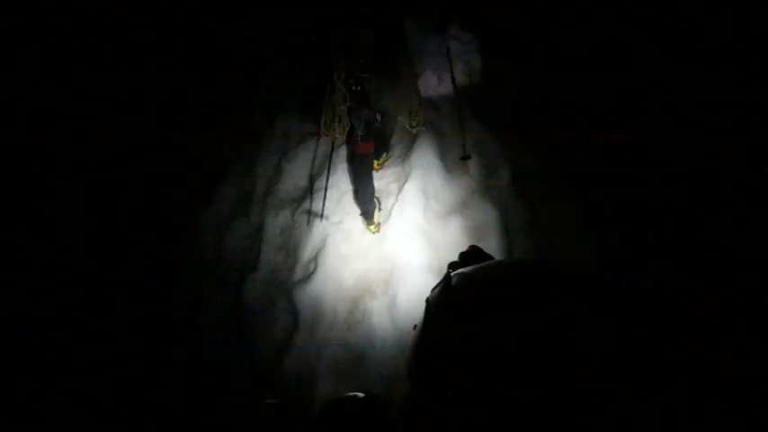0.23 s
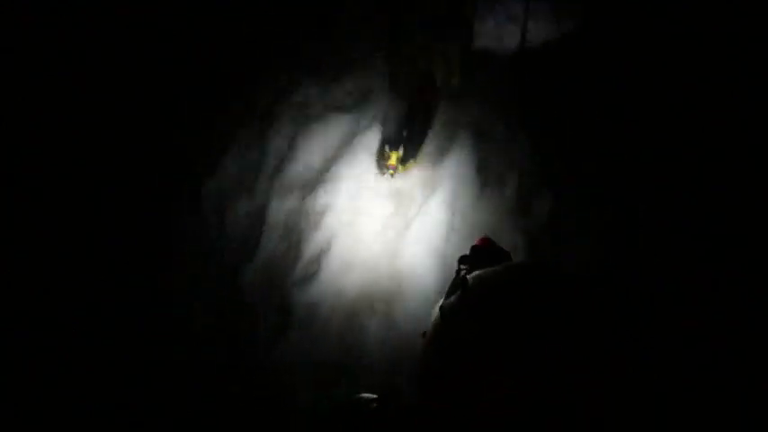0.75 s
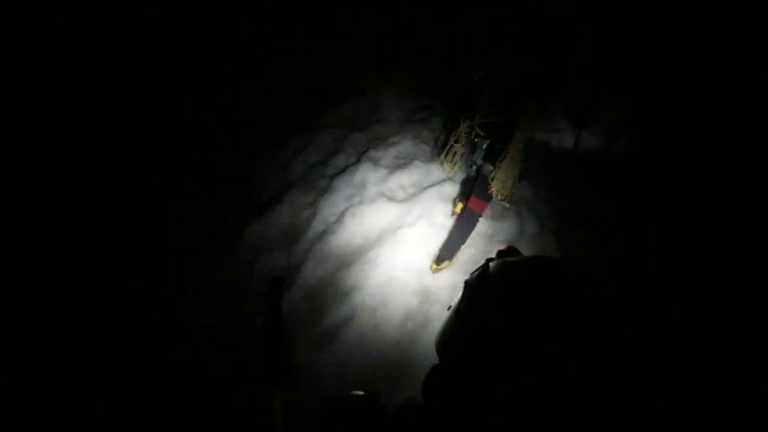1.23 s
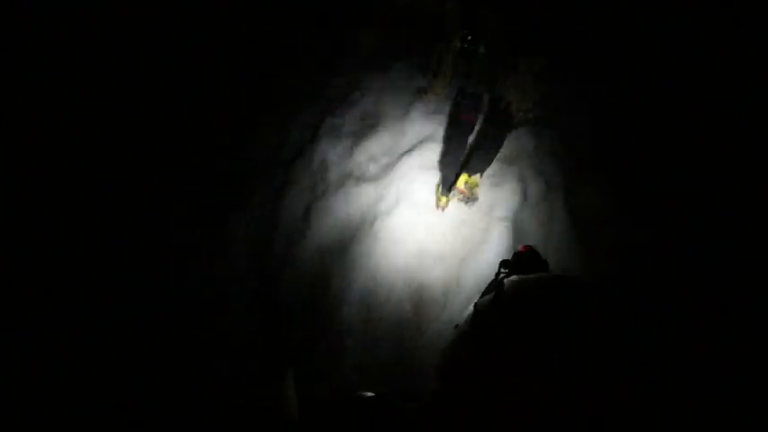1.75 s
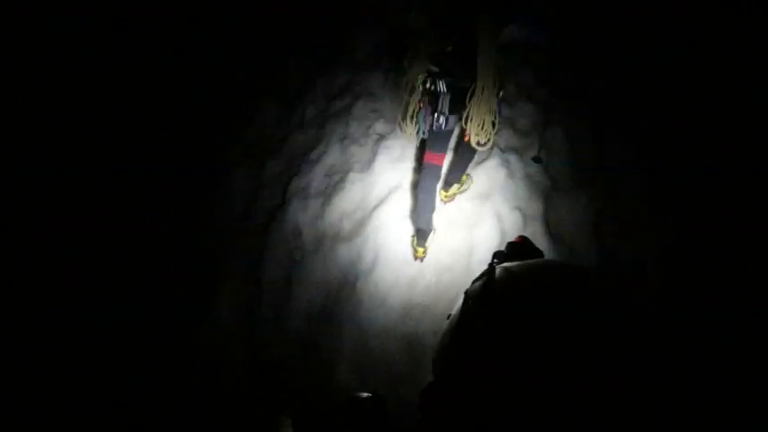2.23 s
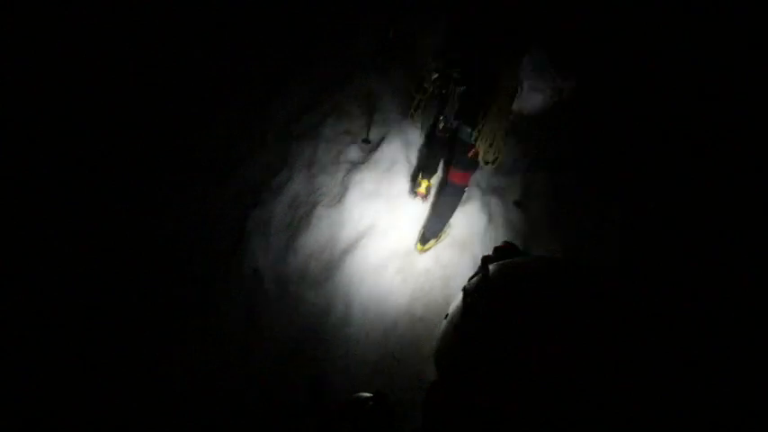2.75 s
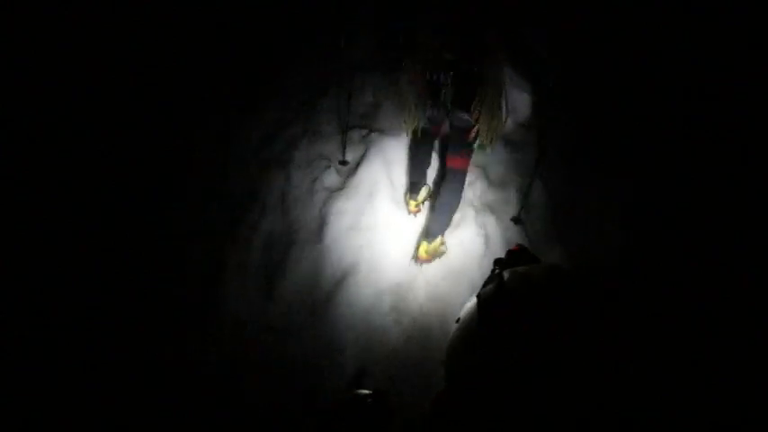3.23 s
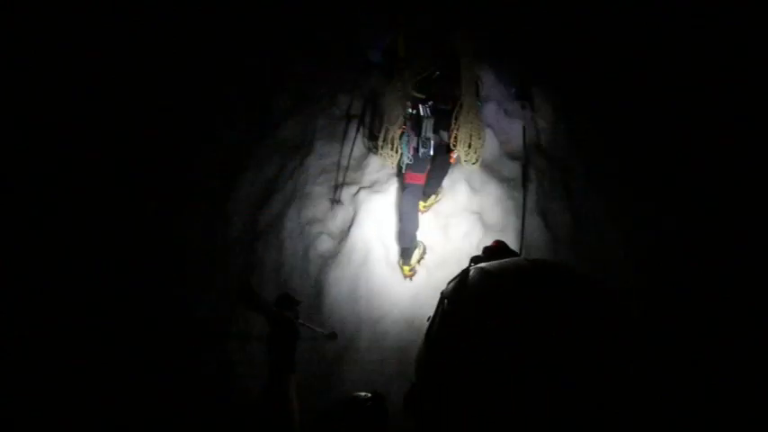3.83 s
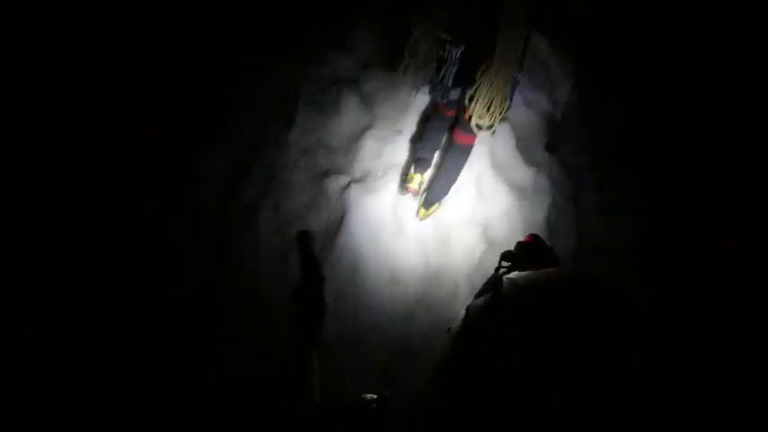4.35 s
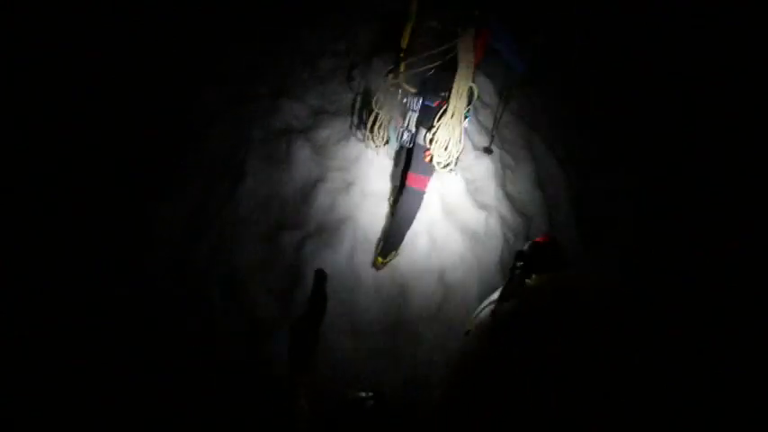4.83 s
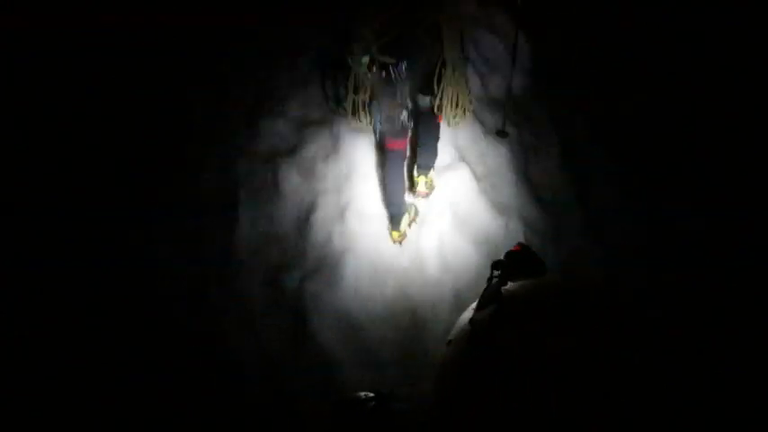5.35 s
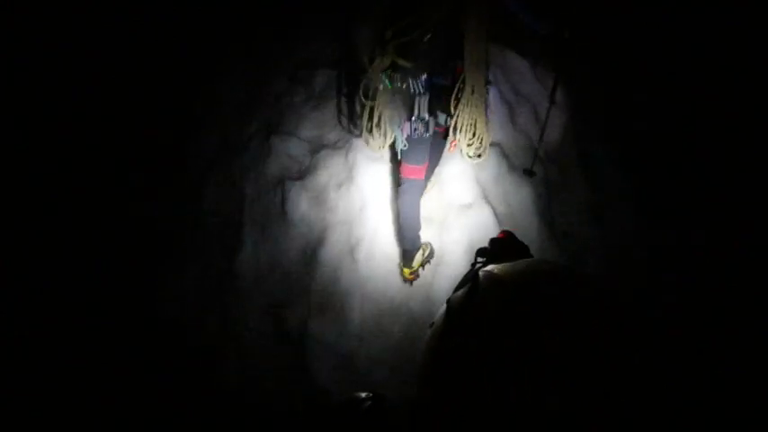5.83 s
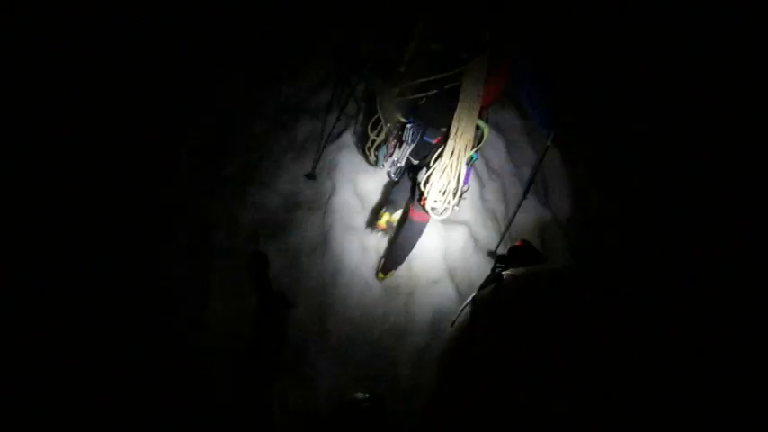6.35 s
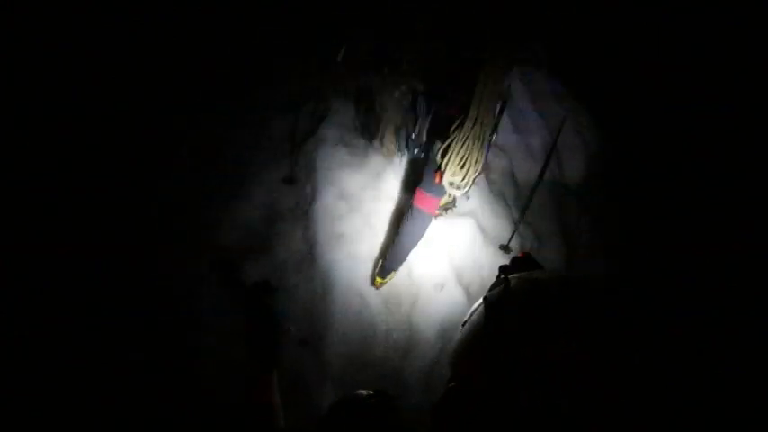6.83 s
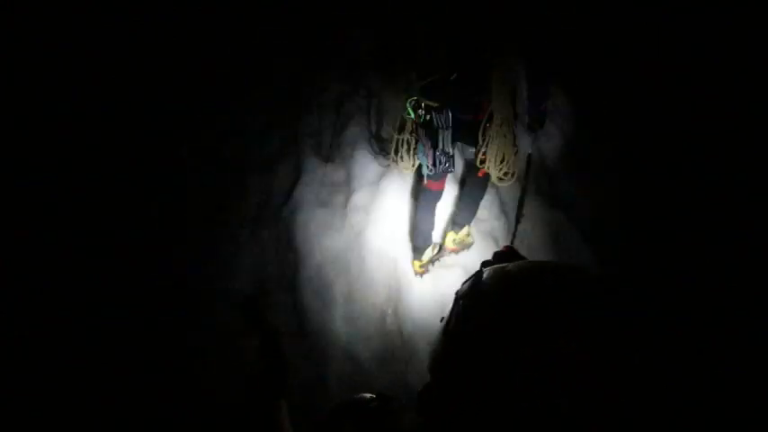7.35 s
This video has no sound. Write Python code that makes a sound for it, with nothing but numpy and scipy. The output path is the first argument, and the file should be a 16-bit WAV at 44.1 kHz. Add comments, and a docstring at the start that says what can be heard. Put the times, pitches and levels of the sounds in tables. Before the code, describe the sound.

Spiked boots tread firm, crusty snow a few metres away on an open slope at night. Each uneven step brings a grainy crunch, collapsing crust and dry snaps. A burst of heavy low thumps hits the microphone early on, a brief icy scrape comes midway, and steel gear clinks now and then. A faint steady hiss lies beneath, in close stereo from a microphone worn by a walker.

```python
"""A snowfield at night: spiked boots tread firm snow a few metres from a two-port microphone worn by a walker.
Snow crystals break in dense grains, crusts collapse in short swells and single cracks snap, all as random
clicks and noise in resonant bands; spikes dragged over ice squeal and steel gear clinks in decaying modes.
The walker's clothing or the moving air buffets the ports with low thumps, over a faint steady hiss.
All levels in dB apply ahead of the microphone's colouring."""
import sys
import numpy as np
from scipy import signal
from scipy.fft import rfft, irfft, next_fast_len
from scipy.io import wavfile
from scipy.ndimage import uniform_filter1d

SR = 44100
rng = np.random.default_rng(int(sys.argv[2]) if len(sys.argv) > 2 else 0)


def inscribe(sig):
    """Save sig as 16-bit PCM at rate SR to the path in sys.argv[1].

    A 1-D sig is mono; a 2-D sig holds one channel per row.
    Samples are clipped to [-1, 1] before scaling.
    """
    pcm = np.round(np.clip(np.atleast_2d(sig).T, -1, 1) * 32767)
    wavfile.write(sys.argv[1], SR, pcm.astype(np.int16))


N = 334719  # samples

# footfalls and light shuffles: (time of full load [s], time under load [s],
# body 300-1000 Hz [dB], crunch 1-3 kHz [dB], crisp 3-10 kHz [dB])
FOOTFALLS = [(-.1, 0.075, -50, -85, -79), (0.239, 0.534, -61, -61, -68.5), (1.231, 0.424, -58, -55.5, -76),
             (1.75, 0.1126, -65, -62.5, -87), (2.141, 0.382, -59.5, -61.5, -62.5),
             (3.012, 0.308, -55.5, -55, -67.5), (3.32, 0.099, -56, -66, -76), (3.6, 0.114, -73, -72.5, -62),
             (3.8, 0.642, -62, -64.5, -67), (4.718, 0.664, -64, -60, -68),
             (5.663, 0.067, -59.5, -54.5, -62), (5.82, 0.2344, -54.5, -54.5, -60),
             (6.151, 0.14, -69.5, -63, -78.5), (6.46, 0.057, -66, -69, -91), (6.7, 0.36, -59, -54.5, -63),
             (7.141, 0.064, -62.5, -61, -85.5)]


def undb(db):
    """Decibels to an amplitude ratio."""
    return 10 ** (np.asarray(db) / 20)


def unit(x):
    """Normalisation to rms 1."""
    return x / np.sqrt(np.mean(x ** 2))


def band(x, lo_hz, hi_hz, order=2):
    """Resonance as a causal Butterworth band-pass."""
    edges = np.clip([lo_hz, hi_hz], 10, 20000)
    return signal.sosfilt(signal.butter(order, edges, "bandpass", fs=SR, output="sos"), x)


def highpass(x, hz, order):
    """Causal Butterworth bass cut."""
    return signal.sosfilt(signal.butter(order, hz, "highpass", fs=SR, output="sos"), x)


def colour(x, points):
    """Spectral shaping through (frequency [Hz], gain [dB]) points on a log-frequency axis."""
    size = next_fast_len(N)
    hz, db = np.transpose(points)
    f = np.maximum(np.arange(size // 2 + 1) * SR / size, 1)
    gain = undb(np.interp(np.log(f), np.log(hz), db))
    return irfft(rfft(x, size) * gain, size)[..., :N]


def pair(x, lag_us):
    """Arrival-time difference: the same sound at both ports, left later by lag_us (half on each side)."""
    size = next_fast_len(len(x))
    f = np.arange(size // 2 + 1) * SR / size
    turn = np.exp(-1j * np.pi * f * lag_us * 1e-6)
    return irfft(rfft(x, size) * np.array([turn, 1 / turn]), size)[:, :len(x)]


def add(out, x, s):
    """Superposition: mix x in from time s; what falls outside is dropped."""
    i = int(s * SR)
    x = x[:, max(-i, 0):N - i]
    out[:, max(i, 0):max(i, 0) + x.shape[1]] += x


def walk(rate):
    """Random modulation: new levels at the given rate, joined by slopes; spread near 1."""
    k = int(SR / rate)
    held = np.repeat(rng.standard_normal(N // k + 1), k)
    return 1.06 * uniform_filter1d(held, k)[:N]


def grains(per_s, spread_db):
    """Random impulse train: clicks of either sign, a few larger than the rest, none huge."""
    chance, sign, size = rng.random((3, N))
    return (chance < per_s / SR) * np.sign(sign - .5) * undb(-spread_db * np.log(1.02 - size))


def crumbs(per_s, spread_db, tail_s):
    """Relaxation: lumps break one by one, the level jumping and then decaying; rms 1."""
    decay = np.exp(-1 / (tail_s * SR))
    return unit(signal.lfilter([1], [1, -decay], np.abs(grains(per_s, spread_db))))


def snow(per_s, spread_db, shared):
    """Brittle fracture: crystals ring by size, some clicks in every band and others in one band alone."""
    # three bands each for body, crunch and crisp: (centre [Hz], width [Hz], level [dB])
    size_bands = [
        [(354, 352.6, 1.5), (521.4, 215, 1), (750, 335, -0.5)],
        [(1383, 640, -5), (1581, 790, -1.5), (2782, 677, -9)],
        [(4140, 1730, -7), (5430, 7160, 1), (8440, 11600, -2.5)],
    ]
    every = shared * grains(per_s, spread_db)
    layers = []
    for group in size_bands:
        layer = 0
        for hz, width, db in group:
            clicks = every + grains(per_s, spread_db)
            layer = layer + undb(db) / np.sqrt(width) * band(clicks, hz - width / 2, hz + width / 2, order=1)
        layers.append(unit(layer))
    return np.array(layers)


def tread():
    """Load-driven fracture: snow patches creak with a fine hiss and lumps breaking in all bands or one."""
    # snow settling between footfalls: (body [dB], crunch [dB], crisp [dB])
    rest_db = [-71, -67, -73.5]
    # left-port lag of each patch of steady crunch: [us]
    patch_lags = [-150, -55, 3.5, 97]
    sink_s, lift_s = 0.047, 0.1022  # the load comes and goes
    shift_db, shift_per_s = 2.5, 9.  # it wavers as the weight shifts
    t, out = np.arange(N) / SR, 0
    load = [np.interp(t, [s - sink_s, s, s + hold, s + hold + lift_s], [0, 1, 1, 0]) ** 2
            for s, hold, *_ in FOOTFALLS]
    gain = undb(rest_db)[:, None] + undb([row[2:] for row in FOOTFALLS]).T @ load
    for lag in patch_lags:
        common = crumbs(30., 2.2, 0.00192)
        own = np.array([crumbs(40.0, 2.76, 0.00393) for _ in range(3)])  # body, crunch, crisp
        lumps = 0.289 + 0.4224 * common + 0.6656 * own
        weight = undb(shift_db * walk(shift_per_s))
        creak = gain * weight * snow(450., 1.96, 0.286) * lumps
        out = out + pair(creak.sum(0), lag)
    return out


def crush():
    """Cavity resonance: a collapse swells and dies as grains from both patch ends, each ringing a hollow."""
    # crust collapses: (time of peak [s], crunch [dB], length [ms], body re crunch [dB],
    # crisp re crunch [dB], left lag [us])
    collapses = [(0.018, -65, 33.5, 13.5, -12.5, 2), (.15, -50.5, 13.1, 5.5, -3.5, 26.5),
                 (0.228, -47.5, 14.7, 0, -3.5, 18), (.268, -41, 19.6, 1, -6.5, 18),
                 (0.3, -49.5, 25, -9.5, -2, 0), (0.439, -36.5, 25.9, -0.5, -8.5, 91),
                 (.487, -48.5, 32.5, 9.5, -9, 54), (0.661, -44.5, 10, -15, -28.5, 37),
                 (1.242, -44, 19.1, 0, 3, -77), (1.351, -41, 33.5, 0.5, -0.5, 26),
                 (1.662, -37.5, 14.7, -2.5, -11, 55.5), (1.833, -37.5, 18.5, -19, -18, -160),
                 (2.152, -46, 15, 8, 6.5, -56), (2.229, -51.5, 23, 6, 0, 0.5),
                 (2.335, -41.5, 22.1, 11.5, -3.5, 32), (2.429, -49, 79.4, 6, -3, -30),
                 (2.477, -41, 13.8, -3, -19.5, -66), (2.67, -50.5, 42.2, -1, -10.5, 68.5),
                 (3.031, -43.5, 20.3, -0.5, 6.5, -53.5), (3.115, -42.5, 29.4, 1.5, 1, 74),
                 (3.199, -40, 5.54, -20, -26, 40.5), (3.821, -43, 24, 4, 3, -52.5),
                 (3.855, -53, 17.7, 6.5, 12.5, -65), (3.938, -41, 24.5, 0, -1, 71),
                 (4.154, -40, 23.9, 0, -5, -29), (4.277, -62.5, 24.3, 22.5, -17.5, -11.5),
                 (4.445, -40.5, 8.4, -15.5, -9, -36), (4.48, -40, 25.1, -28, 0.5, 29.5),
                 (4.715, -48.5, 14.3, -23, -3, -26), (4.742, -41, 24.7, 0.5, 0, -31.5),
                 (4.807, -47, 25, 6, -22, 31), (4.902, -42, 36.2, 7, -8.5, 40.5),
                 (4.955, -57.5, 14.4, 19, -20, 40), (4.992, -51.5, 20.3, 11.5, -25, 41.5),
                 (5.092, -42.5, 13.5, -4, -22, 60), (5.122, -36, 37.1, -9.5, -15.5, 79),
                 (5.338, -48, 8.3, 3, -28.5, -8.5), (5.66, -50.5, 3.24, 9.5, -10, -23),
                 (5.685, -43.5, 23.5, 2, -5, -20), (5.729, -38.5, 14.9, -2.5, -9.5, -20),
                 (5.791, -47.5, 18.8, 14.5, 3.5, 49.5), (5.853, -52, 12.6, 9, -24.5, -3),
                 (5.935, -43.5, 17.6, -3.5, -14, 28), (6.013, -44.5, 21, -20.5, 4, 1.5),
                 (6.039, -56.5, 17.1, 16, 11.5, 0), (6.135, -47, 18.3, -5, 8, 44.5),
                 (6.651, -40, 30, -25.5, -7, -140), (6.721, -38.5, 24.9, 3.5, 3.5, -30.5),
                 (6.93, -36.5, 32.6, -3.5, -5.5, -8), (6.988, -45.5, 26.2, 1, -11, -43),
                 (7.029, -40.5, 6.3, 3.5, -18, -58), (7.064, -47, 36.5, 2, -26.5, -35),
                 (7.246, -62, 20.5, 8.5, -16, 0), (7.567, -52, 16.7, 6.5, 0.5, -27.5)]
    rise_share = 0.5147  # of a collapse's length
    patch_us = 30.65  # the two ends lie this far to either side
    low_hz, high_hz, hollow_db = 1300, 2300, -3.5
    out, stuff = np.zeros((2, N)), snow(1500., 3.82, 0.465)
    t = (np.arange(6144) - 3072) / SR
    for s, db, ms, body_db, crisp_db, lag in collapses:
        side_ms = ms * np.where(t < 0, rise_share, 1 - rise_share)
        # about 5 dB down at both ends of its length; the root shares it between two patch ends
        shape = undb(db - 4.88 * (np.abs(t) * 1000 / side_ms) ** 1.845) / np.sqrt(2)
        for i, end in zip(rng.integers(0, N - len(t), size=2), (-1, 1)):
            piece = stuff[:, i:i + len(t)]
            hz = low_hz * (high_hz / low_hz) ** rng.random()
            hollow = undb(hollow_db) * unit(band(piece.sum(0), .92 * hz, 1.08 * hz, order=1))
            grain = undb([body_db, 0, crisp_db]) @ piece + hollow
            add(out, pair(grain * shape, lag + end * patch_us), s + t[0])
    return out


def small_snaps():
    """Random scatter: rows of lesser snaps, columns as for single snaps, spread over every footfall."""
    snaps_per_s, over_crunch_db, spread_db = 45, 17.5, 4.
    low_hz, high_hz = 593, 3550
    rows = []
    for s, hold, _, crunch_db, _ in FOOTFALLS:
        for when, drop, pitch in rng.random((int(hold * snaps_per_s), 3)):
            db = crunch_db + over_crunch_db - spread_db * drop
            rows.append((s + hold * when, db, low_hz * (high_hz / low_hz) ** pitch, -20., 1.2))
    return rows


def cracks():
    """Damped oscillation: a snap is a few cycles at its pitch and a bright splinter of noise, from any side."""
    # single snaps: (time [s], ring peak [dB], centre [Hz], splinter re ring peak [dB], decay [cycles])
    big_snaps = [(.005, -43, 615, -23.5, 3.6), (.032, -40, 607, -16, 2.6), (.344, -31, 4000, -10, 1.5),
                 (0.121, -38.5, 1440, -29, 1.86), (0.331, -31.5, 1510, -11, 1.24),
                 (.353, -27.5, 1455, -14.5, 2.1), (0.533, -37.5, 974, -9.5, 1.38),
                 (0.716, -38.5, 1597, -27.5, 1.13), (0.738, -38.5, 1500, -21, 1.4),
                 (.839, -47.5, 2000, -6.5, 1.16), (0.899, -44, 4904, -1, 0.91),
                 (1.038, -37.5, 3300, -12, 1.27), (1.041, -34.5, 1820, -28.5, 3.7),
                 (1.117, -51, 1900, -1.5, 4.1), (1.177, -53, 4000, 4, 1.04),
                 (1.312, -30.5, 1550, -14.5, 1.4), (1.389, -30, 1990, -24.5, 1.96),
                 (1.44, -31, 974, -29.5, 1.3), (1.466, -21, 604, -34, 0.474), (1.51, -24, 1235, -20.5, 0.8),
                 (1.62, -26.5, 595, -17, 1.6), (1.649, -25, 606, -17.5, 0.98),
                 (1.685, -25, 1246, -13, 2.04), (1.823, -37.5, 1490, 1.5, 2.064),
                 (2.34, -18, 1693, -34.5, 2.1), (2.441, -27.5, 1735, -17, 1.94),
                 (2.513, -31.5, 1783, -11, 2.21), (2.539, -32.5, 1800, -15, 1.96),
                 (2.6434, -24, 1698, -24, 5), (2.657, -27, 1810, -28, 1.4), (2.676, -31, 1540, -25, 1.54),
                 (2.783, -45.5, 1245, 5.5, 2.56), (2.921, -43.5, 3220, -2.5, 2.6),
                 (3.102, -25, 1022, -24, 1.43), (3.113, -24.5, 1103, -19.5, 1.6),
                 (3.282, -38, 900, -18, 0.83), (3.295, -25.5, 1320, -18, 1.05), (3.306, -30, 780, -8, 0.83),
                 (3.38, -37, 3500, -12.5, 1.28), (3.622, -34.5, 4590, -13, 2.15),
                 (3.798, -41.5, 717, 3, 2.4), (4.01, -31, 1450, -20, 1.04),
                 (4.099, -30.5, 1506, -16.5, 3.55), (4.247, -16, 2270, -10, 2.78),
                 (4.2498, -17.5, 2037, -15.5, 2.13), (4.291, -45, 2000, -8.5, 1.23),
                 (4.3, -26.5, 1895, -4, 4.3), (4.403, -25.5, 3030, -13.5, 1.24),
                 (4.437, -28.5, 2390, -13.5, 2.3), (4.706, -29.5, 1524, -19.5, 6.4),
                 (4.876, -19, 983, -21, 0.797), (5.056, -25, 2470, -15, 1.8),
                 (5.087, -25.5, 2008, -8.5, 2.1), (5.39, -27, 2870, -20, 1.6),
                 (5.588, -45.5, 4540, 2, 1.96), (5.654, -33.5, 582, -13, 1.97),
                 (5.958, -29, 1300, -17.5, 0.95), (6.028, -30.5, 5500, -7, 1.74),
                 (6.174, -33.5, 1815, -17, 3.24), (6.246, -29.5, 616, -18.5, 0.57),
                 (6.27, -30.5, 1590, -28, 2), (6.294, -34, 1790, -18, 2.4),
                 (6.693, -16.5, 1062, -24.5, 0.724), (6.82, -45, 4000, 5, 1.37),
                 (6.839, -31, 2142, -22.5, 2.58), (6.851, -19.5, 1293, -32, 0.64),
                 (6.878, -20.5, 1324, -24, 0.5), (6.898, -22, 1387, -36, 0.79),
                 (6.904, -20.5, 1100, -34.5, 0.5), (6.953, -23.5, 690, -18, 0.46),
                 (6.999, -26, 1705, -9, 0.87), (7.011, -26, 2015, -12.5, 0.76),
                 (7.026, -25, 1705, -9.5, 0.79), (7.055, -33, 1490, -4.5, 1.18),
                 (7.152, -32.5, 1790, -9.5, 3.16), (7.195, -21.5, 2590, -20.5, 1.117)]
    out, t = np.zeros((2, N)), np.arange(1024) / SR
    lead = 32  # samples of room ahead of the snap
    for s, db, hz, splinter_db, cycles in big_snaps + small_snaps():
        cycles = max(cycles, .3)
        onset = np.sin(np.pi / 2 * np.minimum(t * hz / (0.453 * cycles), 1)) ** 2
        ring = np.sin(2 * np.pi * hz * t) * np.exp(-t * hz / cycles) * onset
        splinter = band(rng.standard_normal(len(t)) * np.exp(-t / 0.0037), 0.775 * hz, 7760.0)
        snap = ring / ring.max() + undb(splinter_db) * splinter / splinter[:64].std()
        lag_us = 90. * rng.standard_normal()
        add(out, pair(np.roll(snap, lead), lag_us) * undb(db), s - lead / SR)
    return out


def scrape():
    """Stick-slip friction: dense slips of a spike grate on ice and squeal at a pitch while the drag lasts."""
    # drags: (time [s], length [s], level [dB], left lag [us], squeal [Hz], squeal re drag [dB])
    drags = [(2.185, 0.083, -66.5, -0.5, 1595, 11.5), (3.006, 0.065, -58, 0, 1520, 12),
             (4.128, .045, -50, -21.5, 4800, 5), (4.202, 0.0275, -43.5, -150, 4000, -6),
             (4.225, 0.0345, -30.5, -150, 6735, -8.5), (5.101, 0.0417, -38.5, 77.5, 1855, 3)]
    # what every drag grates with: (centre [Hz], width [Hz], level [dB])
    grate_bands = [(2133, 760, 1.5), (3995, 1824, -1), (5500, 1780, -6.5)]
    pan_db, edge_s = 5.5, 0.0045  # left minus right; fade at the end, half as long at the start
    squeal_width = 0.116  # share of the pitch
    out, t, slips = np.zeros((2, N)), np.arange(4096) / SR, grains(3000., 5.77)
    for s, length, db, lag, hz, squeal_db in drags:
        slip = slips[int(s * SR):][:len(t)]
        bands = grate_bands + [(hz, hz * squeal_width, squeal_db)]
        grate = sum(undb(g) * unit(band(slip, f - w / 2, f + w / 2)) for f, w, g in bands)
        drag = undb(db) * np.interp(t, [0, edge_s / 2, length - edge_s, length], [0, 1, 1, 0])
        add(out, pair(grate * drag, lag), s)
    return out * undb(np.array([[pan_db], [-pan_db]]) / 2)


def steel(blows, modes, scatter_db, click_db):
    """Modal synthesis: chattering contacts click and ring the same fluttering modes in varied shares."""
    pivot_hz, detune = 8000, .004  # where the tilt is nil; spread as a share of the pitch
    rattle_db, rattle_per_s = 4.5, 400.  # flutter of each mode
    chatter_s = 0.00522  # decay time of the contacts after a blow
    out, t = np.zeros((2, N)), np.arange(9000) / SR
    hz, mode_db, t60 = np.transpose(modes)[:, :, None]
    flutter_db = rattle_db * walk(rattle_per_s)
    for s, db, pan_db, tilt_db, share in blows:
        chance = rng.standard_normal((3, 2, len(modes), 1))  # level, phase, pitch; port; mode
        gain = undb(mode_db + tilt_db * np.log2(hz / pivot_hz) + scatter_db * chance[0])
        tone = np.sin(2 * np.pi * hz * (1 + detune * chance[2, 0]) * t + chance[1])
        ring = gain * tone * np.exp(-np.log(1000) * t / (share * t60))
        starts = rng.integers(0, N - len(t), size=len(modes))
        ring = ring * undb([flutter_db[i:i + len(t)] for i in starts])
        chatter = rng.standard_normal((1, 1024)) * np.exp(-t[:1024] / chatter_s)
        chatter[0, 0] = 8.  # the blow itself
        chatter = chatter / np.sqrt(np.sum(chatter ** 2))
        ring = signal.fftconvolve(ring.sum(1), chatter, axes=1)[:, :len(t)]
        burst = rng.standard_normal((2, len(t))) * np.exp(-t / 0.00177)
        click = undb(click_db) * band(burst, 2400.0, 13600.0)
        add(out, (ring + click) * undb(db + np.array([[pan_db], [-pan_db]]) / 2), s)
    return out


def clinks():
    """Free vibration: blows on steel gear with modes that ring on."""
    # blows: (time [s], level [dB], left minus right [dB], tilt [dB per octave], ring time re free [ratio])
    blows = [(0.7659, -40.5, -2, -4, 0.63), (1.366, -35.5, 15, 12, 0.584), (2.456, -44, 0, -6.5, 1.45),
             (6.045, -59.5, 0., -8.5, 0.82), (6.09, -49.5, 5, -20.5, 1.45), (6.3837, -50, 2, -6.5, 2.28),
             (6.7515, -26, -1, -2.5, 0.87)]
    # modes: (frequency [Hz], level [dB], free t60 [s])
    modes = [(3660, -15, .04), (5600, -14, .05), (6300, -8, .02), (6700, -8, .035), (7030, 0, 0.11),
             (8560, -25, .05), (10420, -12, 0.04), (11480, -19, 0.07), (12250, -9, .08)]
    return steel(blows, modes, 2.5, -9.)


def ticks():
    """Strongly damped vibration: blows on steel gear with mostly shorter modes."""
    # blows: (time [s], level [dB], left minus right [dB], tilt [dB per octave], ring time re free [ratio])
    blows = [(0.501, -35, -1, -2.5, 0.96), (2.383, -26, 2, 1.5, 0.96), (4.0977, -26, -3.5, 1, 1.9),
             (4.1175, -28, 4.5, 4, 1.2), (4.148, -43.5, 3, 0, 0.94), (5.6531, -34.5, 5, -2.5, 1.44),
             (5.9063, -24, 2, 6.5, 0.855), (6.0053, -31, -7, 4, 0.96), (6.126, -26, -8.5, -8.5, 0.745)]
    # modes: (frequency [Hz], level [dB], free t60 [s])
    modes = [(3800, -22, .025), (4750, -19, 0.035), (7200, -18, 0.025), (9480, -5, 0.011),
             (11200, -12, .011), (14450, -10, .03)]
    return steel(blows, modes, 3., -6.5)


def thumps():
    """Forced displacement: a push swings one port's membrane for a cycle or a few, with a rough rub on top."""
    # thumps: (time of peak [s], level [dB], pitch [Hz], width [ms], port [1 left, -1 right])
    pushes = [(1.3145, -9, 184.3, 3.17, 1), (1.333, -20, 110, 8.5, 1), (1.351, -21, 105, 6.1, 1),
              (1.381, -19.5, 135.4, 9.5, 1), (1.406, -19.5, 94.5, 22.8, 1), (1.455, -28.5, 174, 19.2, 1),
              (1.499, -18, 152, 2.22, -1), (1.517, -19.5, 101.5, 12.5, 1), (1.544, -16.5, 169.7, 10.75, 1),
              (1.579, -20.5, 131, 39.5, 1), (1.617, -32.5, 212.3, 8.2, -1), (1.632, -14, 162.7, 21.2, 1),
              (2.138, -33.5, 112.7, 10.5, 1), (2.209, -32, 133.8, 26.7, 1), (2.299, -36, 112, 16.5, 1),
              (3.281, -38, 121, 21, 1), (4.043, -25.5, 143, 4.15, 1), (4.086, -31.5, 134.8, 40.6, 1),
              (4.144, -20.5, 131, 7.1, 1), (4.18, -26.5, 115, 27.5, 1), (5.019, -33.5, 117.3, 42.7, 1),
              (5.038, -28.5, 92.2, 9.4, -1), (5.106, -32.5, 85, 7.6, 1), (5.133, -26.5, 111, 10.4, 1),
              (5.962, -37.5, 98.7, 19.6, 1), (6.696, -26, 203, 5.4, -1), (6.863, -30.5, 176.3, 17.6, 1),
              (6.9, -31, 129, 7.2, 1), (7.465, -39.5, 98.6, 15.5, 1)]
    out, t = np.zeros((2, N)), (np.arange(6000) - 3000) / SR
    for s, db, hz, ms, port in pushes:
        rub = unit(band(rng.standard_normal(len(t)), 143.8, 350.6)) * undb(-12.0)
        shape = undb(db - 8.53 * np.abs(2000 * t / ms) ** 1.103)  # 8.5 dB down at both ends of the width
        swing = (np.cos(2 * np.pi * (hz * t + 0.1134)) + rub) * shape
        add(out, swing * np.array([[port > 0], [port < 0]]), s + t[0])
    return out


def ports(pan_db):
    """Power addition: gains of two unrelated ports such that the mean of both keeps its level."""
    return 2 * np.array([1 + undb(-2 * pan_db), 1 + undb(2 * pan_db)]) ** -.5


def buffet():
    """Resonant excitation: soft knocks on each port alone ring the low resonances of the housing."""
    # spells of buffeting: (time of full strength [s], hold [s], level [dB], left minus right [dB])
    gusts = [(.24, 0.105, -61, 13.5), (.46, 0.235, -54.5, 7.5), (1.31, 0.368, -42.5, 11),
             (1.72, 0.209, -56, 4), (2.12, 0.146, -50.5, 30.5), (2.4, 0.252, -57.5, 7.5),
             (3.03, 0.345, -58, 10), (3.74, 0.226, -62, 20.5), (4.03, 0.1895, -46.5, 17),
             (4.98, 0.17, -46.5, 2.5), (5.22, 0.265, -60.5, 1), (5.702, 0.114, -64.5, 14),
             (5.88, 0.206, -51, 6.5), (6.5, 0.112, -62, 14.5), (6.73, 0.2214, -49.5, 8),
             (7.45, .2, -60.5, 13.5)]
    # housing resonances: (centre [Hz], width [Hz], level [dB])
    housing = [(98.3, 74.2, 8.5), (159.5, 69, -7), (248, 500, -24)]
    rise_db_s, fall_db_s, calm_db = 279.5, 171, -77.5  # dB per second, twice; level between spells
    t, gain = np.arange(N) / SR, undb(calm_db) * ports(0.)[:, None]
    for s, hold, db, pan_db in gusts:
        away_db = rise_db_s * np.maximum(s - t, 0) + fall_db_s * np.maximum(t - s - hold, 0)
        gain = gain + undb(db - away_db) * ports(pan_db)[:, None]
    knocks = np.array([grains(500., 0.82) * undb(3.35 * walk(25)) for _ in range(2)])
    boom = sum(undb(g) * unit(band(knocks, hz - w / 2, hz + w / 2)) for hz, w, g in housing)
    return unit(boom) * gain


def night():
    """Partial coherence: steady hiss of slope and microphone, alike in the bass, less related in the treble."""
    # hiss spectrum: (frequency [Hz], level [dB])
    spectrum = [(30, 10), (43, -24.5), (215, -10.5), (295, -2), (1390, -6.5), (5450, -22), (11400, -22),
                (14800, -15), (16000, -40.5)]
    mid, side = rng.standard_normal((2, N))
    side = highpass(side, 1500., 1)
    return unit(colour(np.array([mid + side, mid - side]), spectrum)) * undb(-59.5)


def scene():
    """Linear superposition of the steps, the gear, the buffeted ports and the hiss."""
    steps = tread() + crush() + cracks() + scrape()
    gear = clinks() + ticks()
    return steps + gear + buffet() + thumps() + night()


def record(dry):
    """Linear filtering: microphone colour, a bass cut and a steep cut at the top."""
    # microphone response: (frequency [Hz], gain [dB])
    response = [(30, 9.5), (60, 4), (200, 2), (500, -0.5), (1100, -3), (1700, -4), (2600, -3.5),
                (5500, -1.5), (8000, -6.5), (12000, -7), (15000, -16.5)]
    wet = highpass(colour(dry, response), 48., 3)
    return signal.sosfilt(signal.ellip(8, .2, 70, 15600, fs=SR, output="sos"), wet)


dry = scene()
out = record(dry)
inscribe(out)
```